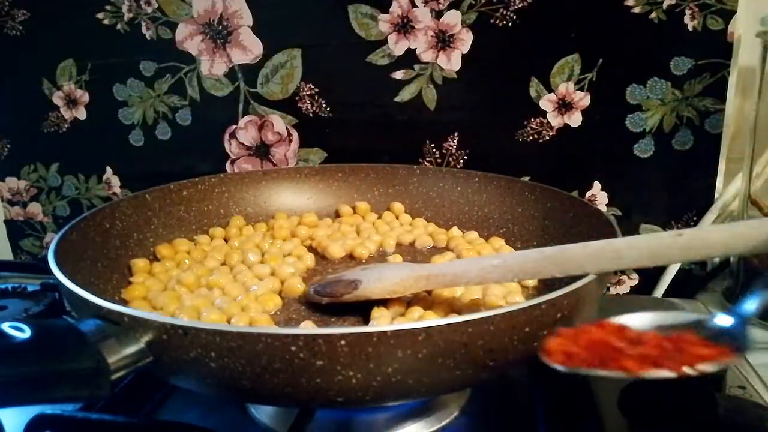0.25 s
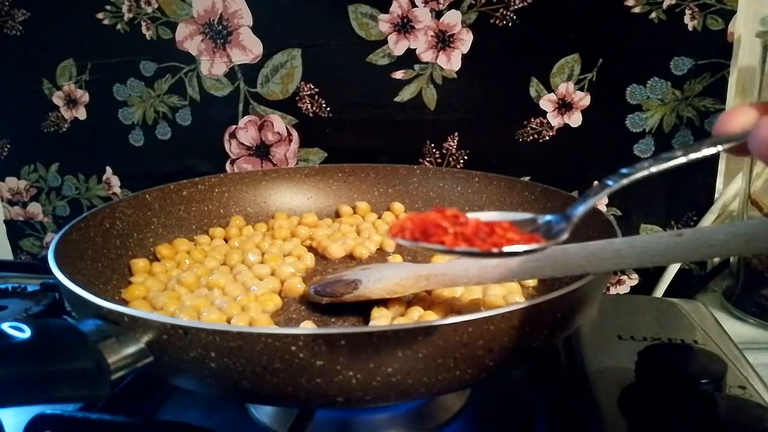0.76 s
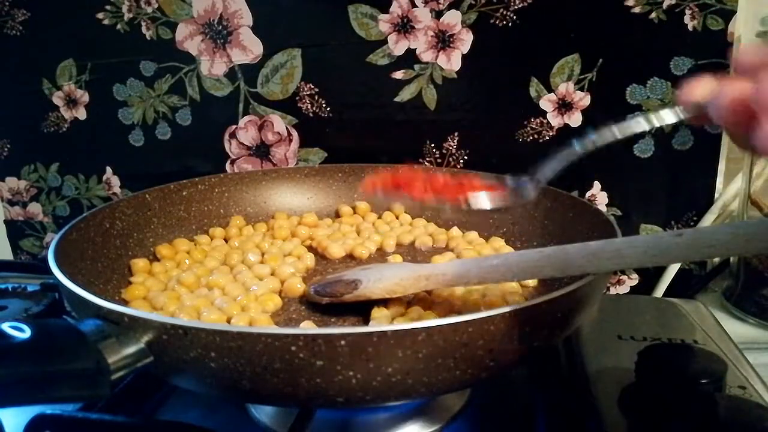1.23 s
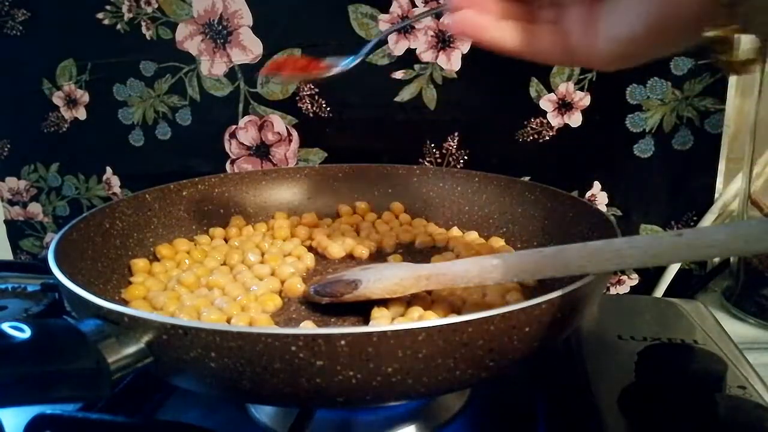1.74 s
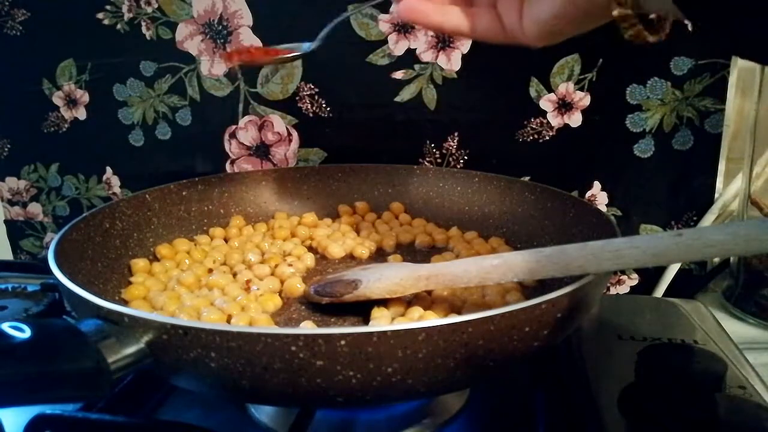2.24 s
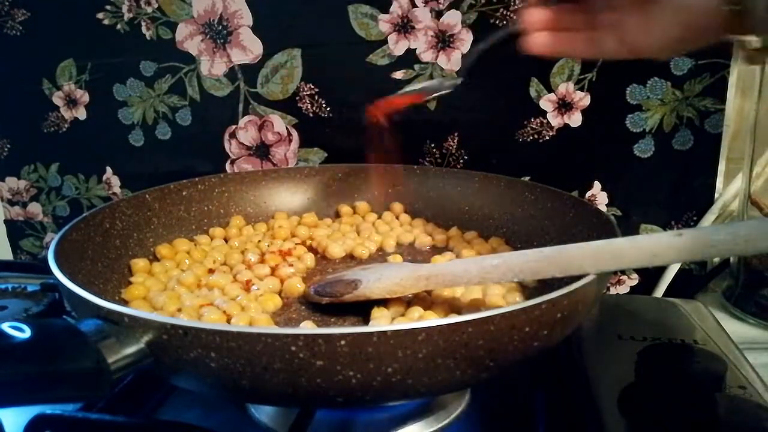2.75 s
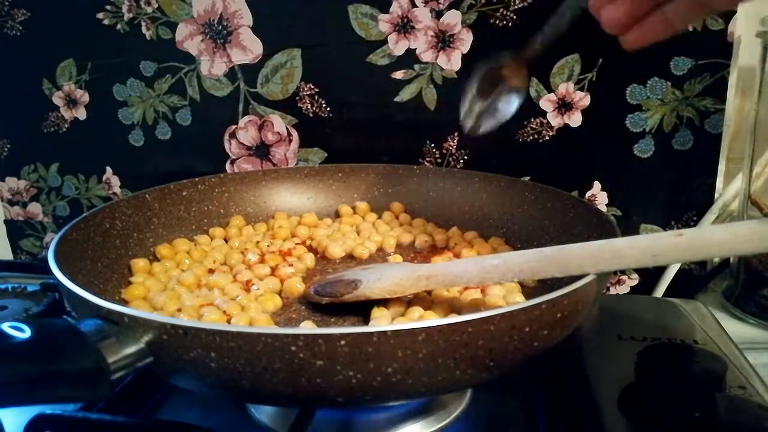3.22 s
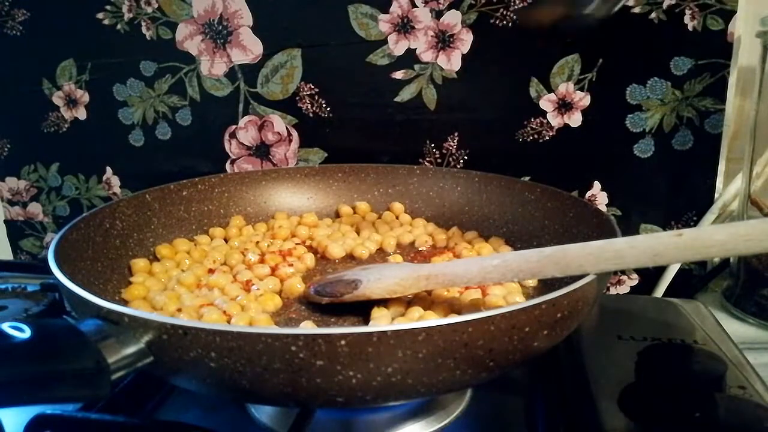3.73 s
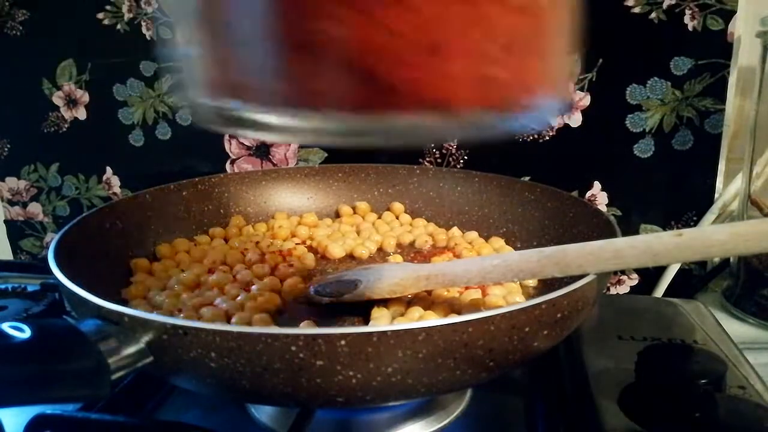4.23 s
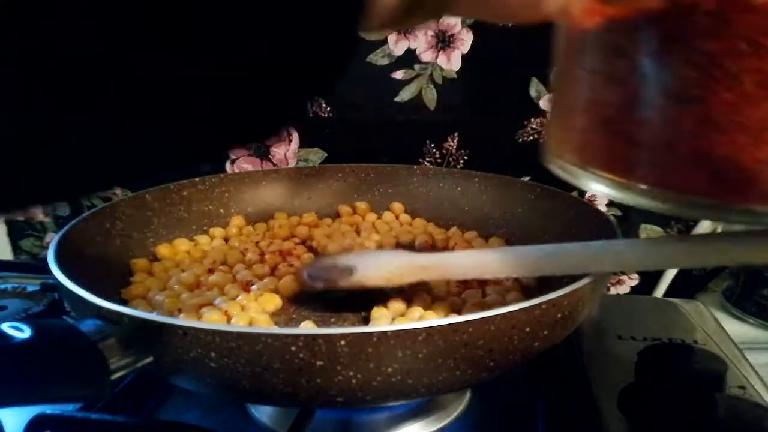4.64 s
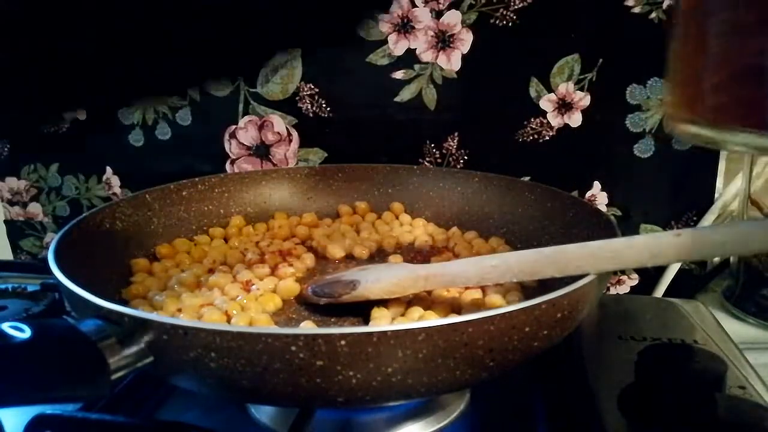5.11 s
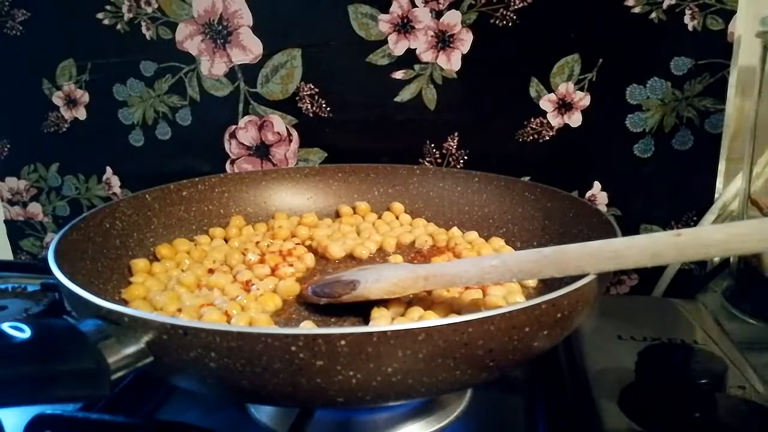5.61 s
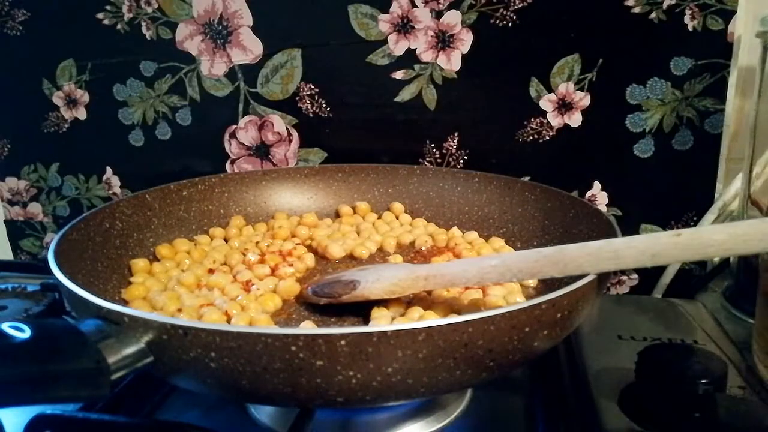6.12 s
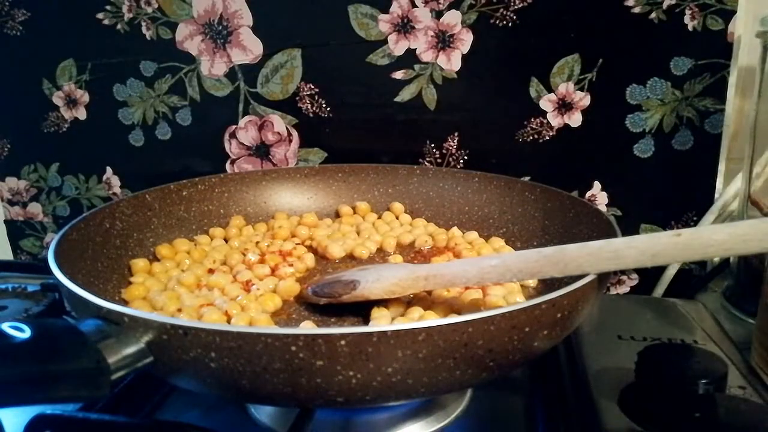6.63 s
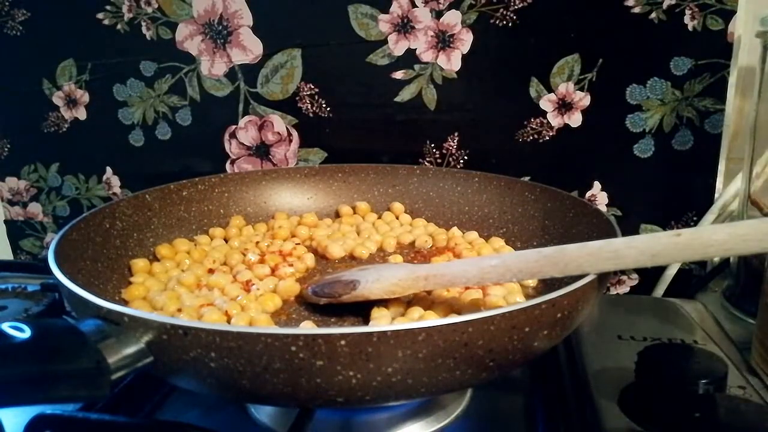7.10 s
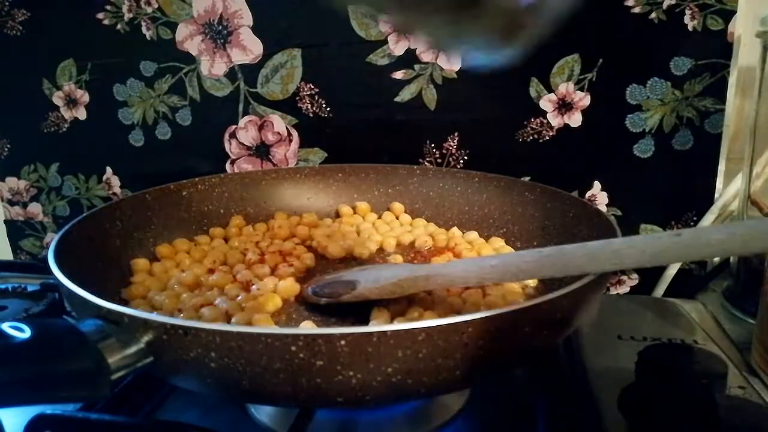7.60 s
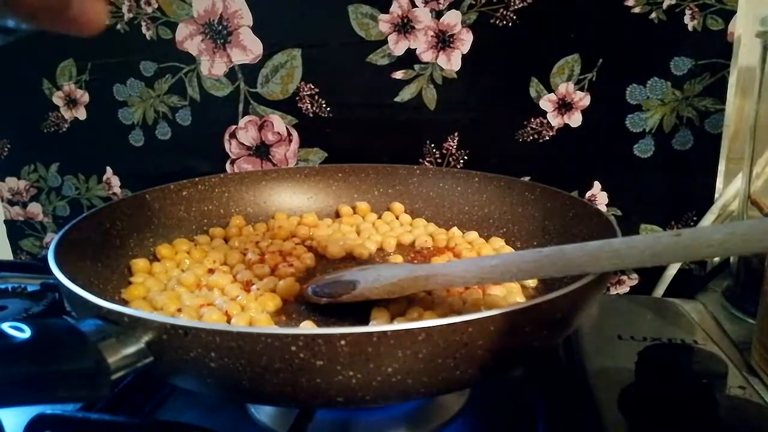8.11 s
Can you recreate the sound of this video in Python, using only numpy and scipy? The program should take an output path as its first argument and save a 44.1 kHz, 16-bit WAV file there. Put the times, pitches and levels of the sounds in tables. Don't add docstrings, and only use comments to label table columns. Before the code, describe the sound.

Hot oil sizzles evenly throughout, near the microphones, peppered with tiny pops and dry droplet ticks above a quiet gas burner. Gentle jar contact on the counter comes first, mostly one hard click with dull bumps; then a much louder double knock with a woody thud and brief glass ring, settling faintly. A bright, quick spoon clink on glass closes it at left. Short kitchen echoes, no speech.

```python
import sys
import numpy as np
from scipy import signal
from scipy.fft import rfft, irfft, next_fast_len
from scipy.io import wavfile
from scipy.ndimage import uniform_filter1d

SR = 44100
rng = np.random.default_rng(int(sys.argv[2]) if len(sys.argv) > 2 else 0)


def invert_db(x):
    u = np.asarray(x, float) / 20
    return 10 ** u


def file_out(sig):
    cols = np.atleast_2d(sig).T
    lim = np.clip(cols, -1, 1)
    pcm = np.round(lim * 32767).astype(np.int16)
    wavfile.write(sys.argv[1], SR, pcm)


N = 368235

# hz, level_db (per Hz)
OIL_COLOUR = [(410, -44), (700, -15), (851, -9.5), (1120, -9.5), (1400, -10.5), (1830, -8.5), (2140, -9.5),
              (2410, -8), (2670, -7), (3290, -5.5), (7670, 0.5), (9090, -1.5), (11900, -12), (15100, -15),
              (15700, -21)]
# hz, likeness (-1 to 1)
LIKENESS = [(130, 1), (200, 1), (380, 0.18), (600, -0.72), (780, -0.041), (1400, 0.92), (1900, 0.29),
            (2300, -0.72), (3000, 0.046)]


def evened(x):
    return x / np.sqrt(np.mean(x ** 2) + 1e-20)


def read(points, hz):
    f, value = np.transpose(points)
    return np.interp(np.log(hz + 1), np.log(f + 1), value)


def add(mix, start_s, sound):
    part = mix[..., round(start_s * SR):][..., :sound.shape[-1]]
    part += sound[..., :part.shape[-1]]


def panned(sound, db):
    return sound * invert_db(np.array([[db / 2], [-db / 2]]))


def coloured(x, gain_db):
    size = next_fast_len(x.shape[-1])
    gain = invert_db(gain_db(np.fft.rfftfreq(size, 1 / SR)))
    return irfft(rfft(x, size) * gain, size)[..., :x.shape[-1]]


def leaned(pair, points):
    return coloured(pair, lambda hz: np.outer([.5, -.5], read(points, hz)))


def ring(modes, length_s=.6):
    t = np.arange(round(length_s * SR)) / SR
    x = sum(invert_db(db - 60 * t / t60) * np.sin(2 * np.pi * hz * t) for hz, db, t60 in modes)
    return x / abs(x).max()


def crack(spectrum_db, decay_s):
    t = np.arange(4096) / SR - .005
    x = rng.standard_normal(len(t)) * (t > 0) * np.exp(-t / decay_s)
    lumps_db = 10 * np.log10(uniform_filter1d(abs(rfft(x)) ** 2, size=24))
    x = coloured(x, lambda hz: spectrum_db(hz) - lumps_db)[200:]
    return x * signal.windows.tukey(len(x), .01) / abs(x).max()


def room(x, gap_s=.004):
    # hz, t60_s
    kitchen_t60 = [(100, 0.46), (400, 0.46), (1500, 0.31), (5000, .28), (12000, 0.13)]
    gap = round(gap_s * SR)
    taps = np.zeros((2, SR // 2))
    at = np.arange(gap, SR // 2 - 16, 16)
    at = at + rng.integers(0, 16, (2, len(at)))
    np.put_along_axis(taps, at, rng.choice([-1., 1.], at.shape), 1)
    hz, t, z = signal.stft(taps, SR, nperseg=512)
    alike = np.clip(read(LIKENESS, hz), 0, 1)[:, None]
    z[1] = alike * z[0] + np.sqrt(1 - alike ** 2) * z[1]
    fade = invert_db(-60 * t / read(kitchen_t60, hz)[:, None])
    tail = signal.istft(z * fade, SR, nperseg=512)[1]
    tail[:, :gap] = 0
    tail = tail / np.linalg.norm(tail[0])
    return signal.fftconvolve(x.mean(0)[None], tail, axes=1)[:, :N]


def spoon(pan_db=7.0, lag_s=.00005):
    # hz, level_db, t60_s
    glass_modes = [(330, -31, .07), (524, -26, .14), (2131, -5, .09), (2132, -13, .4), (2165, -10, .08),
                   (3100, -15, .045), (4043, -16, .09), (5265, -15, .26), (6697, 4, .06), (7655, -1, .07),
                   (9119, -7, .055), (11150, -9, .055), (12000, -12, .05), (13420, -10, .06)]
    # start_s, tick_db, contact_s
    contacts = [
        (8.1752, -30, .0017),
        (8.1767, -22, .0017),
        (8.1786, -17, .0017),
        (8.1804, -10.5, .0017),
        (8.1815, -13, .0017),
        (8.183, -17, .011),
    ]
    strike_s, strike_db, swell_s = 8.1785, -2, .002
    blow, glass = np.zeros(N), ring(glass_modes, .3)
    swell = 1 - np.exp(-np.arange(len(glass)) / SR / swell_s)
    add(blow, strike_s, invert_db(strike_db) * glass * swell)
    for start_s, tick_db, contact_s in contacts:
        tick = crack(lambda hz: -24.0 * np.log2((hz + 99) / 6900) ** 2, contact_s)
        add(blow, start_s, invert_db(tick_db) * tick)
    left = invert_db(pan_db / 2) * blow
    right = invert_db(-pan_db / 2) * np.roll(blow, round(lag_s * SR))
    return np.array([left, right])


def jar(landings, rings, colour, decay_s, lean):
    # hz, level_db, t60_s
    board_modes = [(45, -12, .15), (62, -13, 0.11), (85.6, -4.5, 0.22), (111.9, 1, 0.32), (225, 3, 0.13),
                   (249.6, 0, 0.13), (280, 1, 0.12), (320, 2, 0.18), (389, -2, 0.18), (430, 1, 0.11),
                   (497, -1, 0.14)]
    # hz, level_db, t60_s
    jar_modes = [(890, 3, 0.05), (1165, 0, 0.052), (1190, -14, 0.035), (1400, -20, .05), (1567, -6, 0.04),
                 (1770, -5, 0.057), (3220, -4, 0.024), (3934, -5, 0.075), (4800, -4, 0.04),
                 (6045, -7.5, 0.037), (7100, -18, .04), (7930, -8.5, 0.059)]
    soft_hz = 2500
    floor_hz = 55
    near, low = np.zeros(N), np.zeros(N)
    for start_s, crack_db, thud_db, hard_hz, thud_hz in landings:
        contact = crack(lambda hz: read(colour, hz) - 10 * np.log10(1 + (hz / hard_hz) ** 6),
                        decay_s * max(soft_hz / hard_hz, 1))
        add(near, start_s, invert_db(crack_db) * contact)
        board = ring([(hz, db - 10.0 * np.log2(hz / thud_hz) ** 2, t60) for hz, db, t60 in board_modes], .4)
        push = rng.standard_normal(1500) * np.exp(-np.arange(1500) / SR / 0.0076)
        thud = signal.fftconvolve(board, push)
        add(low, start_s, invert_db(thud_db) * thud / abs(thud).max())
    for start_s, ring_db, bright_db in rings:
        struck = [(hz, db + bright_db * np.log2(hz / 3000) + rng.normal(0, 1.7), t60)
                  for hz, db, t60 in jar_modes]
        add(near, start_s, invert_db(ring_db) * ring(struck, .2))
    pair = np.array([np.roll(near, round(.0006 * SR)), near])
    pair = leaned(pair, lean) + low
    return signal.sosfilt(signal.butter(2, floor_hz, "high", fs=SR, output="sos"), pair)


def nudged_jar():
    # start_s, crack_peak_db, thud_db, hardness_hz, thud_pitch_hz
    nudges = [
        (4.566, -46, -35, 1500, 215),
        (4.580, -70, -38, 1000, 70),
        (4.647, -20.5, -46, 12000, 450),
        (4.655, -31.5, -38, 3500, 420),
        (4.911, -40, -35.5, 1500, 400),
        (4.94, -52, -39.5, 1000, 380),
        (5.000, -41, -48, 6000, 420),
    ]
    # hz, level_db (per Hz)
    nudge_colour = [(180, -37), (300, -4.5), (515, -2), (669, -6), (1310, -12), (1440, -12), (2970, -15),
                    (7790, -7.5), (15000, -33)]
    # hz, lean_db
    nudge_lean = [(60, 0.0), (180, 2), (550, 5), (1650, 16.5), (4970, 3), (15000, -5)]
    return jar(nudges, [], nudge_colour, .007, nudge_lean)


def knocked_jar():
    # start_s, crack_peak_db, thud_db, hardness_hz, thud_pitch_hz
    knocks = [
        (6.112, -10, -38, 2000, 330),
        (6.140, -60, -45, 1500, 80),
        (6.168, -43, -22.5, 1500, 300),
        (6.182, -7, -31, 6060, 123),
        (6.323, -46, -42, 5000, 92),
        (6.415, -25.5, -42, 1500, 500),
    ]
    # start_s, level_db, brightness_db (per octave)
    rings = [
        (6.112, -9, 0.0),
        (6.182, -16, 1.0),
        (6.323, -26, 5.0),
    ]
    # hz, level_db (per Hz)
    knock_colour = [(240, -31), (400, -7), (493, -7), (700, -4), (1620, 0), (2300, -9), (3120, -5),
                    (4260, -9), (4730, -4.5), (8960, -14.5), (14000, -45)]
    # hz, lean_db
    knock_lean = [(60, 4), (120, -2), (240, 0.0), (480, -4), (950, -15.5), (1890, 11), (3770, -2.5),
                  (7520, -3), (15000, -13)]
    return jar(knocks, rings, knock_colour, 0.0039, knock_lean)


def hiss(patchy_db=0.94, flicker_db=1.07):
    # hz, level_db (per Hz)
    flame_colour = [(15, -35), (25, -10), (97, 2.5), (124, -5.5), (165, -16.5), (325, -10.5), (522, -19.5),
                    (584, -16), (700, -17.5), (910, -51), (1540, -120)]
    frames, hz = N // 256 + 5, np.fft.rfftfreq(1024, 1 / SR)
    a, b, c, d, patches = rng.standard_normal((frames, 513, 5)).T
    patches = uniform_filter1d(patches, size=16, axis=0)
    patches = evened(uniform_filter1d(patches, size=5, axis=1))
    flicker = evened(uniform_filter1d(rng.standard_normal(frames), size=8))
    same = np.clip(read(LIKENESS, hz), -1, 1)[:, None]
    left, other = a + 1j * b, c + 1j * d
    z = np.array([left, same * left + np.sqrt(1 - same ** 2) * other])
    oil = invert_db(read(OIL_COLOUR, hz)[:, None] + patchy_db * patches + flicker_db * flicker)
    flame = invert_db(read(flame_colour, hz) + 0.5)[:, None]
    z *= np.hypot(oil, flame)
    return evened(signal.istft(z, nperseg=1024, noverlap=768)[1][:, :N])


def pop(hz, cycles):
    u = np.arange(0, 5 * cycles, hz / SR) / cycles
    x = np.sin(2 * np.pi * cycles * u * (1 + 0.014 * u)) * u * np.exp(-1.6 * u)
    return x / abs(x).max()


def fizz(per_s=1500, spread_db=3.5, count=16):
    out = np.zeros((2, N))
    for hz in np.geomspace(1500, 14000, count):
        drift = evened(uniform_filter1d(rng.standard_normal(N // 64 + 1), size=10))
        clumps = invert_db(7.0 * drift).repeat(64)[:N]
        burst = rng.random(N) < per_s / count / SR * clumps / clumps.mean()
        strength = invert_db(spread_db * np.minimum(rng.exponential(1, N), 4))
        size = burst * strength * rng.choice([-1, 1], N)
        place = rng.random(N)
        right = np.roll(size * np.sqrt(1 - place), rng.integers(-28, 28))
        sides = np.array([size * np.sqrt(place), right])
        bubbles = signal.oaconvolve(sides, evened(pop(hz, 2.2))[None])[:, :N]
        out += invert_db(read(OIL_COLOUR, hz)) * np.sqrt(hz) * bubbles
    return evened(out)


def droplets():
    # start_s, peak_db
    ticks = [(0.7856, -47), (1.8766, -44), (1.9365, -45), (2.4394, -45), (2.7751, -41), (3.3852, -46),
             (3.47, -43), (4.344, -44), (5.4321, -46), (7.1581, -41), (7.7468, -44), (7.9694, -48)]
    out = np.zeros((2, N))
    for start_s, peak_db in ticks:
        tick = crack(lambda hz: -14.0 * np.log2((hz + 99) / 9800) ** 2, 0.0047)
        add(out, start_s, panned(invert_db(peak_db + 1.5) * tick, -3.5))
    return out


def spits(count=30):
    # start_s, peak_db, bubble_pitch_hz, left_over_right_db
    loud_spits = [(0.163, -36, 5940, 3), (0.5482, -36.5, 7060, 1.5), (0.7851, -37, 7200, -2),
                  (0.999, -37, 6500, 7), (1.0415, -36, 6380, 4), (1.0989, -35.5, 7350, 2),
                  (1.4072, -35, 7910, -6), (1.846, -38, 5050, 4), (1.921, -34, 4950, 1.5),
                  (2.044, -35, 7600, 4), (2.233, -37, 9200, 0.0), (2.5481, -34.5, 6960, 6),
                  (2.5835, -36, 7900, -5), (2.604, -35, 5630, 1.5), (2.703, -37, 8390, -1),
                  (3.054, -33.5, 6500, -2), (3.195, -36, 6920, 0.5), (4.207, -37.5, 6460, 2),
                  (4.2697, -37, 7700, 1), (4.998, -38.5, 4850, -0.5), (5.064, -29.5, 6300, 0.0),
                  (5.098, -35, 7250, 1.5), (5.622, -35, 6790, 2), (5.6444, -35, 7300, 0.5),
                  (5.882, -34, 6500, 2), (6.018, -35, 8100, -1), (7.3906, -36, 8600, -0.5),
                  (7.583, -37, 5900, 2), (7.7472, -36.5, 6840, 0.5), (7.9694, -37, 7430, 1.5)]
    sputter_s = .012
    faint_top_db, faint_range_db, faint_low_hz, faint_high_hz = -38, 8.0, 5600, 8700
    rows = list(loud_spits)
    for k, (when, soft, pitch, side) in enumerate(rng.random((count, 4))):
        rows.append(((k + when) / count * N / SR, faint_top_db - faint_range_db * soft,
                     faint_low_hz + (faint_high_hz - faint_low_hz) * pitch, 3.0 * (side - .4)))
    out = np.zeros((2, N))
    for (start_s, db, hz, pan_db), draws in zip(rows, rng.random((len(rows), 10, 4))):
        for k, (late, detune, size, lag) in enumerate(draws):
            late *= k > 0
            level_db = db - .5 - (k > 0) * (5.0 * size + 4.1 * late)
            bubble = invert_db(level_db) * pop(hz * (1 + 0.24 * (detune - .5)), 3.2)
            left, right = panned(bubble, pan_db)
            pop_s = start_s + sputter_s * late
            add(out[0], pop_s, left)
            add(out[1], pop_s + .0006 * lag, right)
    return out


def frying():
    # start_s, level_db
    boil_levels = [(0.0, -49), (0.21, -51), (1.07, -50), (1.53, -50.5), (2.91, -50), (3.65, -51),
                   (4.86, -50), (5.14, -50.5), (5.88, -50.5), (6.21, -48), (6.42, -51), (7.02, -51),
                   (7.28, -50.5), (8.35, -50.5)]
    # hz, lean_db
    pan_lean = [(550, -0.5), (800, 5), (1200, -1), (1800, -0.5), (2700, 2), (4200, -0.5), (6500, 2.5),
                (8000, 1), (9500, -3.5), (15000, -4.5)]
    start_s, boil_db = np.transpose(boil_levels)
    boil = invert_db(np.interp(np.arange(N) / SR, start_s, boil_db) + 2.0)
    bubbles = invert_db(-7.0) * boil * fizz()
    spit = spits() + droplets()
    echoes = room(invert_db(-1.5) * bubbles + invert_db(-14.0) * spit)
    return leaned(boil * hiss() + bubbles + spit + echoes, pan_lean)


def scene():
    knocks = nudged_jar() + knocked_jar()
    clink = spoon()
    return frying() + knocks + invert_db(-4.5) * room(knocks) + clink + invert_db(-9.5) * room(clink)


def low_pass(x):
    return signal.sosfilt(signal.butter(12, 15850, fs=SR, output="sos"), x)


def record(dry):
    edge_hz = 15770
    limited = coloured(dry, lambda hz: -90. * (hz > edge_hz))
    return low_pass(limited)


dry = scene()
out = record(dry)
file_out(out)
```